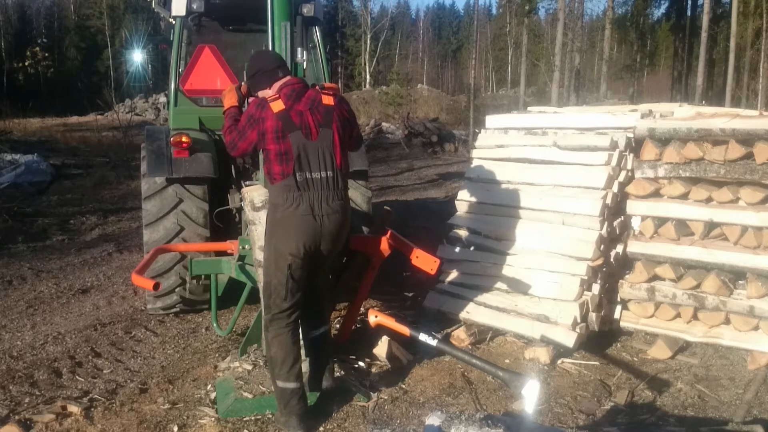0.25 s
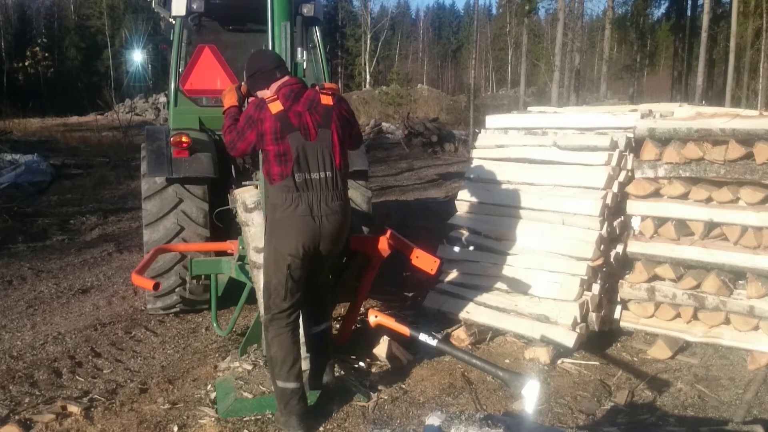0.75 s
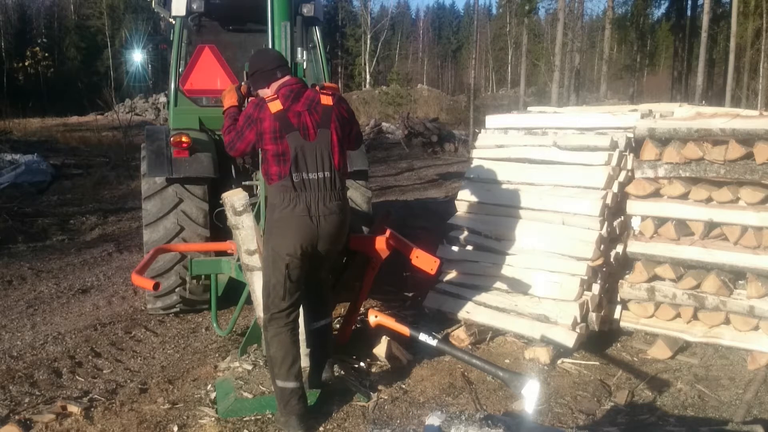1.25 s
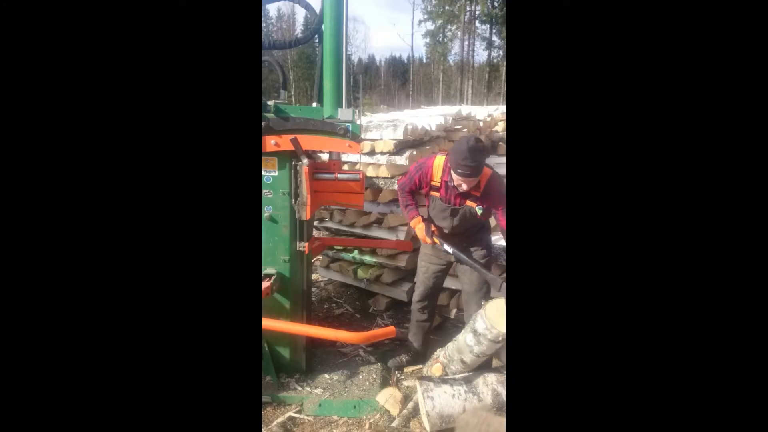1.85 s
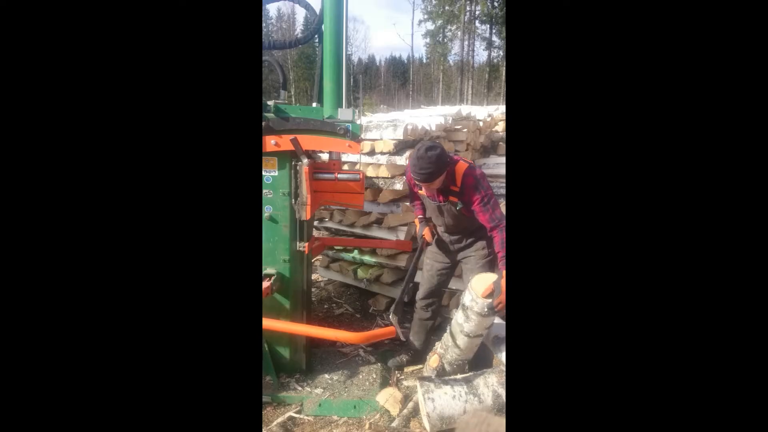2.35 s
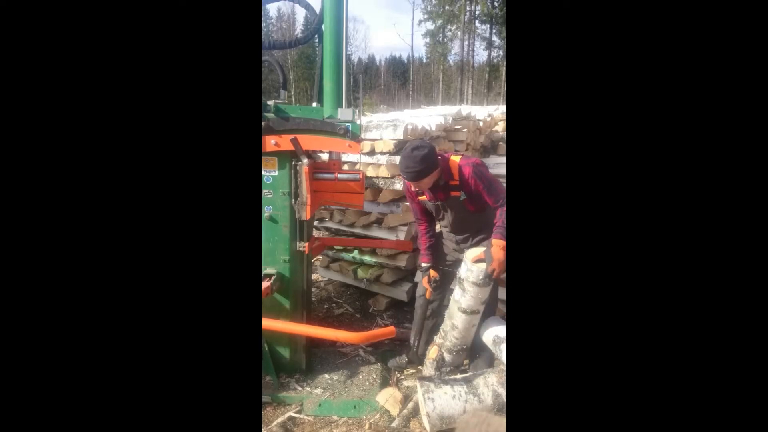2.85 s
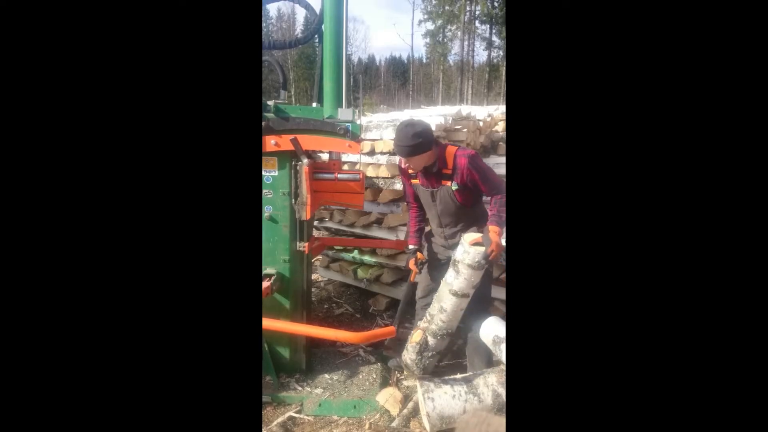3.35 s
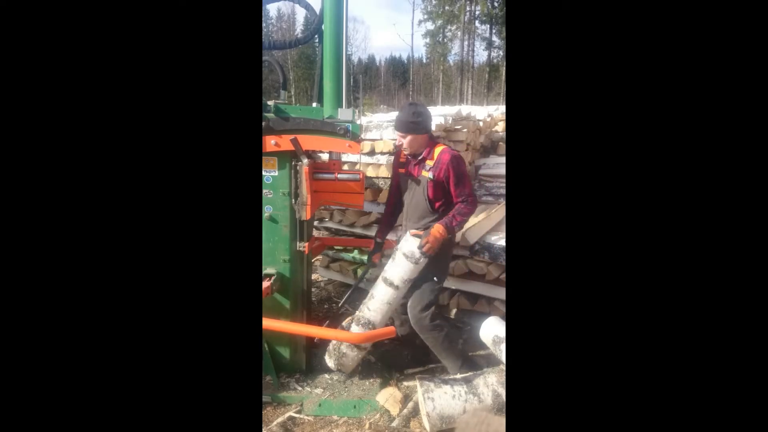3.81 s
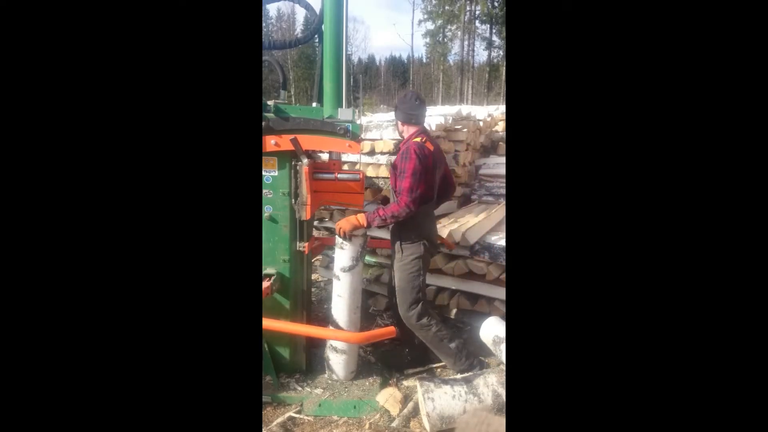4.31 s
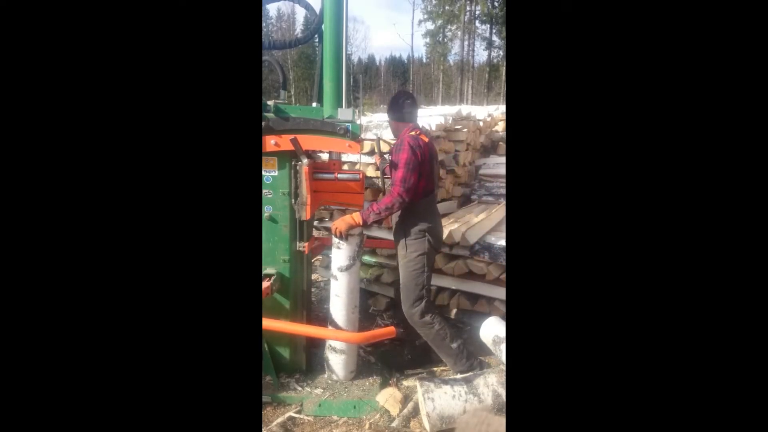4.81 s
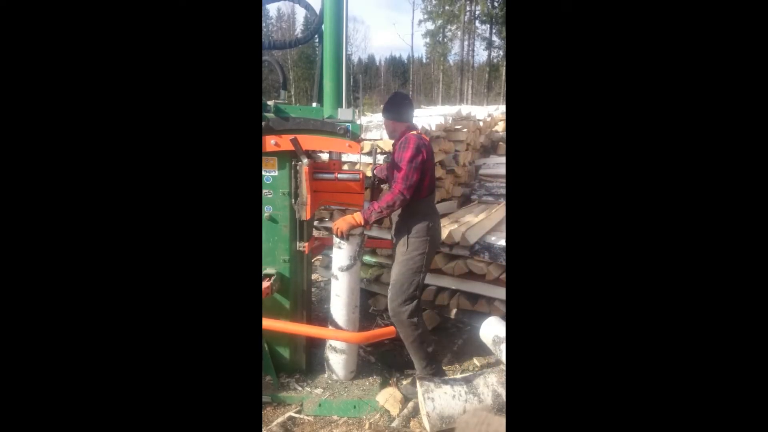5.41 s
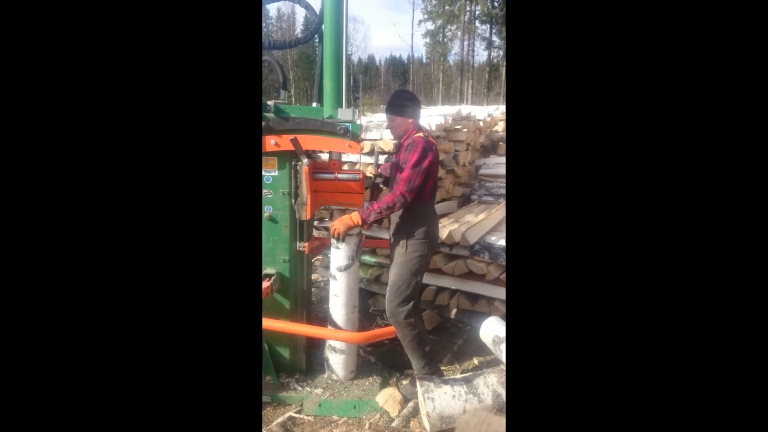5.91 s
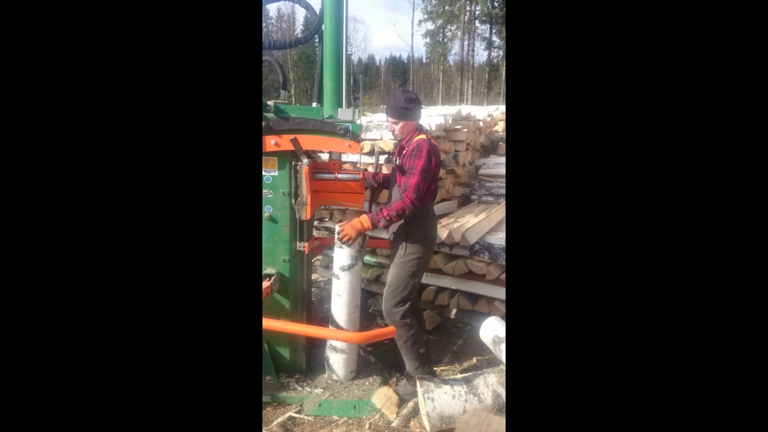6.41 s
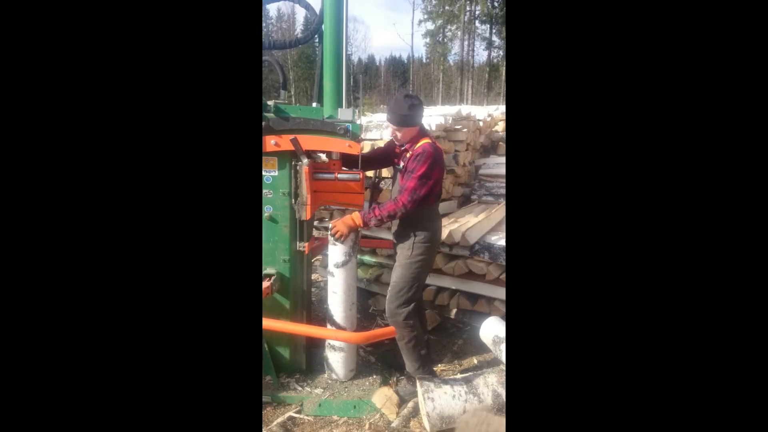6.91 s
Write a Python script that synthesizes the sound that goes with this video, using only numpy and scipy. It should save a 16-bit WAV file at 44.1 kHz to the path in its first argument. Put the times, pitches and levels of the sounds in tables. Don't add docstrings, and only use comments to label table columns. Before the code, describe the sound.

A steady low diesel chug with clatter; hydraulic hiss swells twice, wood ripping, knocking and snapping sharply, with tiny steel squeaks.

```python
import sys
import numpy as np
from scipy import signal
from scipy.fft import rfft, irfft
from scipy.io import wavfile

SR = 44100
rng = np.random.default_rng(int(sys.argv[2]) if len(sys.argv) > 2 else 0)


def elevation(decibels):
    levels = np.asarray(decibels, float)
    return 10 ** (levels / 20)


def materialize(psi):
    bounded = np.clip(np.atleast_2d(psi).T, -1, 1)
    quanta = np.round(bounded * 32767).astype(np.int16)
    wavfile.write(sys.argv[1], SR, quanta)


N = 315756
TIME = np.arange(N) / SR
PADDED = 327680
BINS_HZ = np.maximum(np.fft.rfftfreq(PADDED, 1 / SR), 1)
FIRING_HZ = 22.96


def rms_one(x):
    return x / np.sqrt(np.mean(x ** 2) + 1e-20)


def in_time(rows):
    s, *columns = np.transpose(rows)
    return [np.interp(TIME, s, c) for c in columns]


def on_bins(points):
    hz, value = np.transpose(points)
    return np.interp(np.log(BINS_HZ), np.log(hz), value)


def colour(x, spectrum):
    cepstrum = irfft(np.log(elevation(on_bins(spectrum))))
    cepstrum[1:PADDED // 2] *= 2
    cepstrum[PADDED // 2 + 1:] = 0
    response = np.exp(rfft(cepstrum))
    return rms_one(irfft(rfft(x, PADDED) * response)[:, :N])


def in_bands(x):
    # lower f/Hz, upper f/Hz
    band_edges = [(280, 2000), (2000, 7000), (7000, 17000)]
    filters = [signal.butter(3, edges, "band", fs=SR, output="sos") for edges in band_edges]
    return [rms_one(signal.sosfilt(sos, x)) for sos in filters]


def drift(rate):
    r = np.exp(-80 * np.pi * rate / SR)
    noise = rng.standard_normal(N // 40 + 2002)
    slow = signal.lfilter([1], [1, -2 * r, r * r], noise)[2000:]
    return np.interp(np.arange(N) / 40, np.arange(len(slow)), rms_one(slow))


def resonance(x, hz, width_hz):
    r = np.exp(-np.pi * width_hz / SR)
    zeros = [(1 - r * r) / 2, 0, (r * r - 1) / 2]
    poles = [1, -2 * r * np.cos(2 * np.pi * hz / SR), r * r]
    return signal.lfilter(zeros, poles, x)


def grains(per_s, spread_db):
    happens = rng.random(N) < per_s / SR
    sizes = elevation(spread_db * np.minimum(rng.exponential(1, N), 5)) * happens
    return rms_one(sizes * rng.choice([-1, 1], (2, N)))


def envelope(start, length, t60, rise):
    age = TIME - start
    fall = elevation(-60 * np.clip(age - length, 0, 2 * t60) / t60)
    return np.clip(age / rise, 0, 1) * fall * (age < length + 2 * t60)


def pressure():
    build_s, drop_s = 0.15, 0.69
    # pressure starts to build t/s, starts to drop t/s
    strokes = [
        (0.66, 2.47),
        (4.4, 7.5),
    ]
    return sum(np.clip((TIME - on) / build_s, 0, 1) - np.clip((TIME - off) / drop_s, 0, 1)
               for on, off in strokes)


def fuelling(firings):
    idle_db, loaded_db = -18, 1.66
    governor_db_per_hz, governor_s = 1.5, 0.11
    hold = np.exp(-1 / (governor_s * SR))
    slip_hz = signal.lfilter([1 - hold], [1, -hold], np.gradient(firings) * SR - FIRING_HZ)
    return idle_db + loaded_db * pressure() - governor_db_per_hz * slip_hz


def exhaust(firings, uneven_db):
    steady_db = -18
    # order, level/dB
    orders = [(2, -1.5), (3, 1), (4, -3), (5, -4), (6, -9.5), (7, -20.5), (8, -54.5), (9, -25)]
    cylinders = [0.7, 1, -0.16]
    count = np.arange(-1, 200)
    stroke_db = np.array(cylinders)[count % 3] + uneven_db * rng.standard_normal(len(count))
    phase = firings + .8
    stroke = np.floor(phase) + np.clip(3 * (phase % 1), 0, 1) - 2
    change_db = fuelling(firings) - steady_db + np.interp(stroke, count, stroke_db)
    angle = 2 * np.pi * firings + np.pi + .45
    out = 0
    for k, db in orders:
        evened = .35 if k == 2 else 1
        lead = 1.9 * (2 / k) ** 5
        out = out - elevation(db + evened * change_db) * np.sin(k * angle + lead)
    return elevation(steady_db - 2.1) * out


def block(firings, knock_db):
    clatter_db = -41
    pump_hz, pump_db = 203.6, -34
    # f/Hz, level/dB per Hz
    clatter_spectrum = [(160, -41), (280, -0.5), (332, -1.5), (435, -7.5), (515, -4.5), (610, -6.5),
                        (722, -12.5), (1240, -14.5), (1570, -31.5), (1800, -15), (2490, -30), (4420, -21),
                        (6410, -40.5), (16000, -74)]
    # f/Hz, width/Hz, level/dB
    panel_modes = [(78, 36.4, -33), (112.6, 38, -35), (173.3, 45, -35.5), (240, 19.6, -37.5),
                   (329.8, 21, -49)]
    swell = elevation(knock_db * np.cos(2 * np.pi * firings) + 1.0 * drift(15))
    clatter = elevation(clatter_db - 2.0) * swell * colour(grains(9000, spread_db=0.0), clatter_spectrum)
    shaking = rng.standard_normal((2, N))
    panels = sum(elevation(db) * rms_one(resonance(resonance(shaking, hz, w), hz, w)) for hz, w, db in panel_modes)
    hum = elevation(pump_db + 1.05 * drift(9.8)) * np.sin(2 * np.pi * pump_hz * TIME + .5 * drift(3.0))
    return clatter + panels + hum


def body(x):
    # f/Hz, width/Hz, level/dB
    body_modes = [(584, 103, -4), (753, 175, 7), (928, 220, -9), (1240, 49, 1.5), (1402, 19, 3),
                  (1638, 240, -7.5), (3410, 21, -9.5), (4340, 88, 1), (4700, 260, -1.5), (5340, 1060, -4),
                  (10350, 1600, -1.5)]
    return x + sum(elevation(db) * resonance(x, hz, w) for hz, w, db in body_modes)


def ram(patchy_db):
    rumble_db, rush_db, hiss_db = (-41.5, -34), (-53.5, -39), (-74, -46)
    # f/Hz, level/dB per Hz
    oil_spectrum = [(180, -24.5), (300, 6.5), (372, 0.5), (787, -4), (994, -7.5), (1410, -11), (2840, -17),
                    (4370, -17), (6960, -28), (10900, -24), (16000, -27.5)]
    # t/s, share 0-1
    flow_curve = [(0.0, 0.28), (.42, 0.06), (.68, 0.2), (.84, 0.9), (1.3, 0.95), (1.75, 0.67), (2.11, 0.54),
                  (2.57, 0.51), (2.75, 0.82), (2.91, 0.51), (3.09, 0.2), (3.53, 0.13), (4.33, 0.1),
                  (4.51, 0.48), (4.65, .98), (4.95, 0.73), (5.3, 0.75), (7.16, 0.69)]
    bands = in_bands(colour(body(grains(8000, spread_db=1.5)), oil_spectrum))
    together = drift(24.0)
    flow = np.clip(in_time(flow_curve)[0], 0, 1)
    out = 0
    for (rest_db, full_db), drive, band in zip([rumble_db, rush_db, hiss_db], [pressure(), flow, flow], bands):
        patches_db = patchy_db * (together + .5 * drift(25))
        out = out + elevation(rest_db + (full_db - rest_db) * drive - 1.0 + patches_db) * band
    return out


def squeaks():
    # t/s, length/s, f/Hz, width/Hz, level/dB
    rubs = [(.045, .02, 9890, 80, -42), (.655, .025, 9600, 50, -48), (1.19, .025, 8100, 40, -55),
            (2.684, .012, 5140, 40, -36), (2.69, .04, 9510, 36, -41), (4.455, .04, 8070, 29, -46),
            (1.9, .02, 6500, 120, -53), (6.67, .04, 9520, 40, -56), (5.345, .03, 9800, 150, -45),
            (4.455, .03, 5300, 90, -43), (4.46, .03, 9500, 60, -52)]
    rubbing = rng.standard_normal((2, N))
    return sum(elevation(db) * rms_one(resonance(rubbing, hz, w)) * envelope(s, length, 0.074, rise=0.0016)
               for s, length, hz, w, db in rubs)


def tearing(lumpy_db):
    t60_s, rise_s = 0.13, .002
    low_db, high_db = 0.56, -8.5
    flake_s, flake_bright_db = 0.0088, 9.5
    # t/s, length/s, level/dB, brightness/dB
    tears = [(.627, 0.023, -39.5, -3), (.654, 0.045, -40.5, -5), (.685, 0.03, -37, -1),
             (.753, 0.038, -31, -4), (.834, 0.028, -31, 2.5), (.875, 0.052, -22.5, -1),
             (.937, 0.041, -27, -1), (1.018, 0.027, -28.5, -3.5), (1.073, 0.0087, -17.5, 2.5),
             (1.173, 0.03, -29, -0.5), (1.245, 0.033, -31, 1.5), (1.303, 0.04, -34.5, 2),
             (1.39, 0.017, -38.5, 7), (1.595, 0.067, -38.5, -1.5), (2.548, 0.032, -40, -8.5),
             (2.672, 0.061, -33.5, -2.5), (2.743, 0.03, -43.5, -9.5), (2.86, 0.047, -47, -8),
             (4.456, 0.061, -38.5, -4.5), (4.564, 0.046, -28, -3.5), (4.624, 0.049, -34, 3),
             (4.658, 0.086, -22.5, 1.2), (4.749, .055, -30, 4), (4.855, 0.0047, -25, 3),
             (4.882, 0.034, -34.5, -0.5), (5.034, 0.047, -25, 3.5), (5.091, 0.064, -35, 3.5),
             (5.293, 0.0095, -25.5, 4.5), (5.342, 0.04, -25, 5), (6.05, 0.032, -46.5, -10.5)]
    # t/s, level/dB
    flakes = [(.045, -38), (1.354, -36), (1.494, -38), (2.67, -35), (2.786, -42), (2.85, -52), (5.168, -39),
              (5.99, -53), (6.433, -45), (6.562, -41.5), (7.017, -38.5), (7.045, -44)]
    # f/Hz, level/dB per Hz
    wood_spectrum = [(150, -13), (250, 2), (308, 2), (452, -3.5), (607, -3), (845, -3.5), (955, -3.5),
                     (1040, -1.5), (1450, -4.5), (1530, -5), (2670, -6), (4570, -3), (6590, -14),
                     (14400, -24.5), (16000, -22)]
    fibres = grains(4000, spread_db=2.5) * elevation(lumpy_db * (drift(70) + 1.16 * drift(25)))
    breaks = tears + [(s, flake_s, db, flake_bright_db) for s, db in flakes]
    bands = in_bands(colour(body(fibres), wood_spectrum))
    out = 0
    for band, linger, band_db, lean in zip(bands, [1.1, .8, .6], [low_db, 0, high_db], [-1, 0, 1]):
        strength = sum(elevation(db + band_db + lean * bright_db - 2.5) * envelope(s, length, linger * t60_s, rise_s)
                       for s, length, db, bright_db in breaks)
        out = out + band * strength
    return out


def thumps():
    # t/s, f/Hz, t60/s, peak level/dB
    blows = [(.878, 420, .12, -21), (.895, 300, .15, -19), (1.035, 1300, .06, -24), (4.66, 310, .15, -25),
             (4.72, 600, .1, -21), (4.785, 1400, .04, -19), (5.04, 950, .06, -21), (.353, 700, .04, -29),
             (6.755, 650, .04, -27), (.765, 800, .1, -25), (2.555, 1600, .1, -33), (5.296, 3500, .02, -26),
             (4.86, 1500, .06, -22), (4.898, 1300, .04, -22), (4.565, 900, .08, -23),
             (1.076, 1050, .06, -22), (1.175, 900, .05, -24), (.945, 750, .06, -21),
             (4.733, 1250, .06, -21), (1.262, 1100, .05, -25), (.898, 500, .08, -18),
             (1.045, 1550, .07, -23), (.77, 750, .1, -25), (5.088, 1400, .04, -25)]
    return sum(elevation(db) * np.sin(2 * np.pi * hz * (TIME - s)) * envelope(s, 0, t60, rise=.002)
               for s, hz, t60, db in blows)


def snaps():
    snap_hz, snap_spread = 4700, .1
    # t/s, peak level/dB, knock level/dB
    fibre_snaps = [(0.6898, -25, -28), (0.9444, -24, -15.5), (1.0754, -20.5, -14), (1.1756, -14.5, -39),
                   (1.2474, -30, -44), (1.2642, -42, -15), (1.3209, -25, -24), (1.357, -27, -25),
                   (2.6723, -40, -28), (4.5626, -24, -19), (4.6587, -19, -19), (4.7303, -15, -8.5),
                   (4.785, -15, -4), (4.8583, -17, -23), (4.8967, -17, -32), (5.0263, -33, -21),
                   (5.04, -11.5, -16), (5.0588, -12, -12), (5.0882, -12.5, -34), (5.1716, -35, -27.5),
                   (5.2855, -19, -30), (5.2969, -6.5, -36.5), (5.3384, -19, -48), (5.7876, -32, -36),
                   (5.9935, -26, -40), (6.0247, -27.5, -39), (6.0545, -24, -28), (6.0786, -29, -23),
                   (6.562, -26, -32), (7.0177, -38, -41)]
    out, age = np.zeros((2, N)), TIME[:1500]
    draws = rng.random((len(fibre_snaps), 5))
    for (s, peak_db, knock_db), draw in zip(fibre_snaps, draws):
        hz = snap_hz * (1 + snap_spread * (draw[4] - .5))
        second_hz = hz * (0.743 + 0.024 * draw[2])
        turn = 2 * np.pi * draw[3] * np.array([[0], [1]])
        pair = np.sin(2 * np.pi * hz * age + turn) + 0.66 * np.sin(2 * np.pi * second_hz * age - turn)
        ring = pair * age / 0.00049 * np.exp(1 - age / 0.00056)
        noise = 2 * rng.standard_normal((2, len(age)))
        tick = 0.47 * resonance(noise, 4700, 4100) * np.exp(-age / 0.0014)
        knock = sum(np.sin(2 * np.pi * low_hz * (0.85 + 0.43 * share) * age) * np.exp(-age / 0.0022)
                    for low_hz, share in zip([800, 1350], draw))
        at = round(s * SR)
        out[:, at:at + len(age)] += elevation(peak_db - 3.3) * (ring + tick) + elevation(knock_db - 8.0) * knock
    return out


def ports(x):
    # f/Hz, level/dB
    port_levels = [(45, -6.5), (90, -5), (200, -4.5), (400, -1.5), (700, 0.8), (1400, -0.5), (2800, 1),
                   (5000, 8.5), (9000, 4), (13000, 1.5)]
    # f/Hz, phase/rad
    port_leads = [(40, 0.8), (300, 0.43), (1200, 0.96), (1900, 1.43), (2700, 4.06), (4800, 3.75), (8000, 5)]
    # f/Hz, share 0-1
    direct_shares = [(60, .99), (250, .95), (600, .9), (1200, .8), (2500, .74), (5000, .78), (10000, .64)]
    direct, scattered = rfft(x, PADDED)
    share = np.clip(on_bins(direct_shares), 0, 1)
    half = elevation(on_bins(port_levels) / 2) * np.exp(.5j * on_bins(port_leads))
    middle = np.sqrt(share * abs(half + 1 / half) ** 2 + (1 - share) * abs(half - 1 / half) ** 2) / 2
    left = half * (np.sqrt(share) * direct + np.sqrt(1 - share) * scattered)
    right = (np.sqrt(share) * direct - np.sqrt(1 - share) * scattered) / half
    return irfft(np.array([left, right]) / middle)[:, :N]


def scene():
    # t/s, lead/firings
    crank_lead = [(0.0, -0.128), (0.62, -0.07), (0.74, -0.085), (0.92, -0.168), (1.16, -0.207),
                  (1.7, -0.133), (2.16, -0.183), (2.8, -0.194), (3.05, -0.098), (3.28, -0.14),
                  (4.08, -0.125), (4.48, -0.085), (4.72, -0.183), (4.98, -0.236), (5.28, -0.252),
                  (5.86, -0.187), (6.72, -0.211), (7.16, -0.19)]
    firings = FIRING_HZ * TIME + in_time(crank_lead)[0]
    engine = exhaust(firings, uneven_db=0.27) * [[1], [0]] + block(firings, knock_db=1.1)
    wood = tearing(lumpy_db=0.96) + snaps() + thumps() * [[1], [.3]]
    return ports(engine + ram(patchy_db=1.43) + wood + squeaks())


def band_limit(x):
    return signal.sosfilt(signal.butter(12, 16520, fs=SR, output="sos"), x)


def record(dry):
    rounded = 1.133 * np.tanh(dry / 1.221)
    top_cut = signal.cheby2(10, 45, 16000 + 300, fs=SR, output="sos")
    return band_limit(signal.sosfilt(top_cut, rounded))


dry = scene()
out = record(dry)
materialize(out)
```